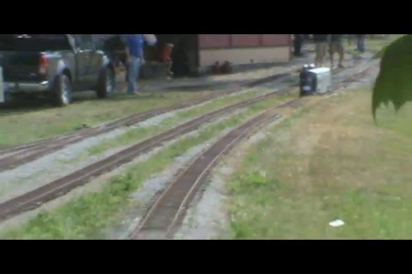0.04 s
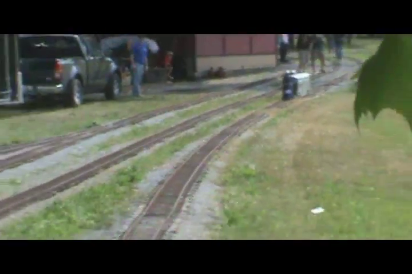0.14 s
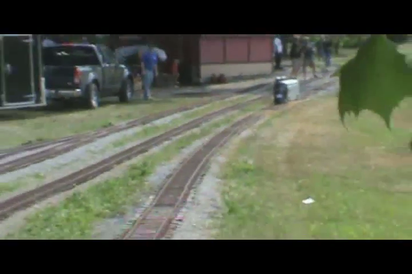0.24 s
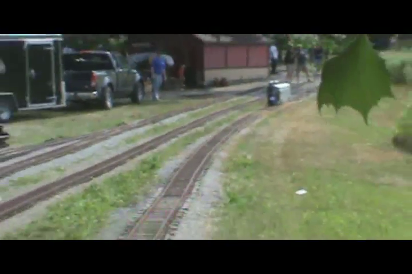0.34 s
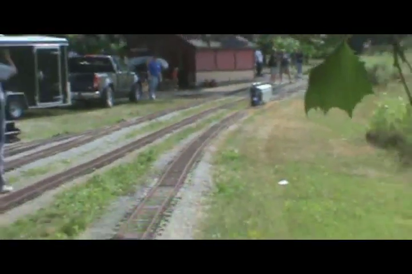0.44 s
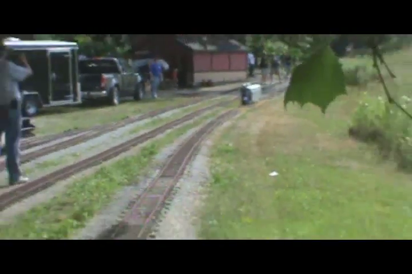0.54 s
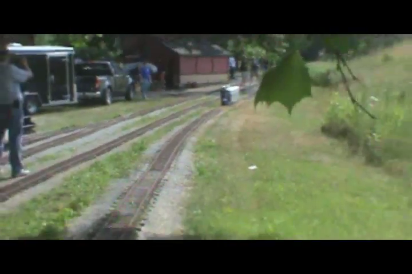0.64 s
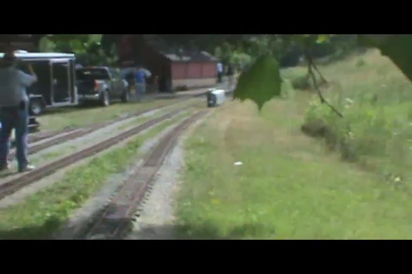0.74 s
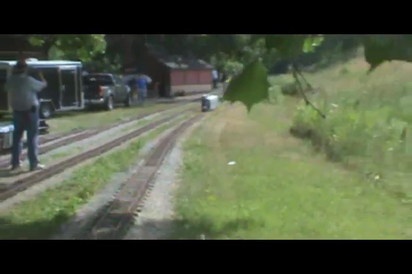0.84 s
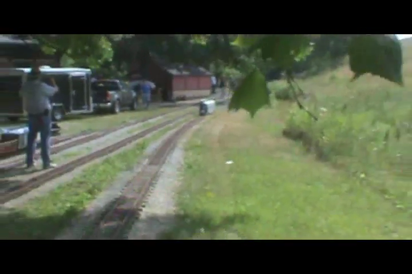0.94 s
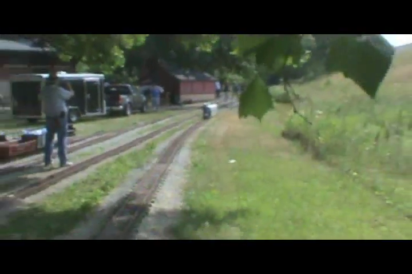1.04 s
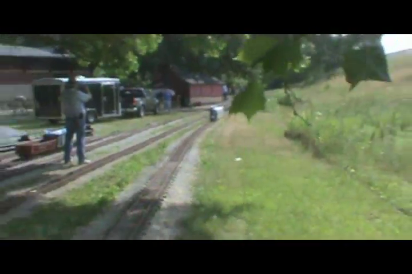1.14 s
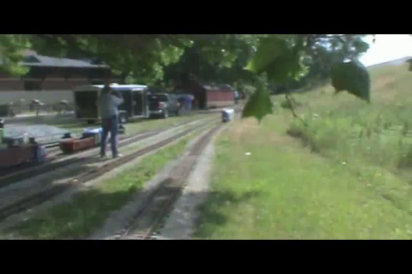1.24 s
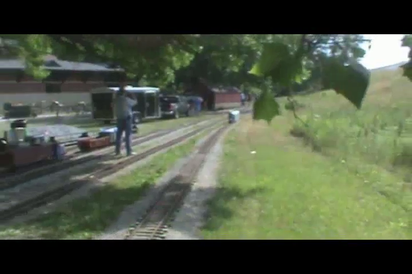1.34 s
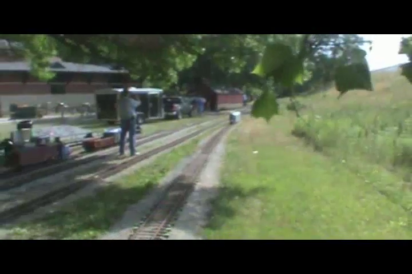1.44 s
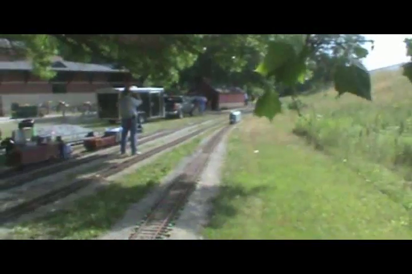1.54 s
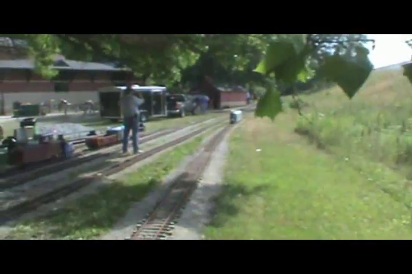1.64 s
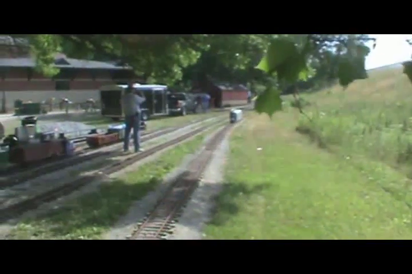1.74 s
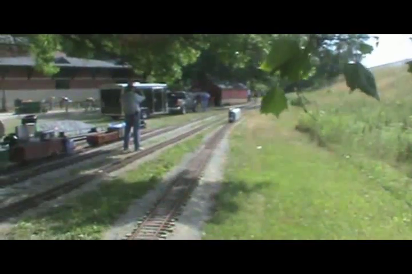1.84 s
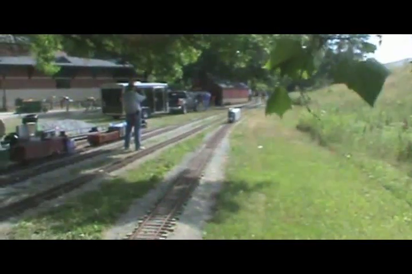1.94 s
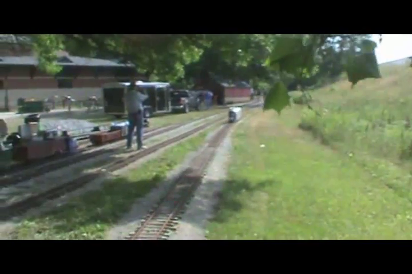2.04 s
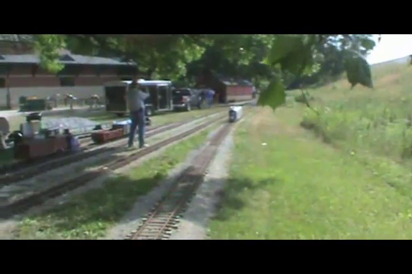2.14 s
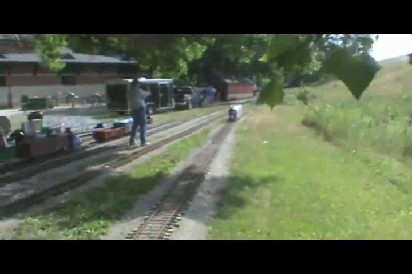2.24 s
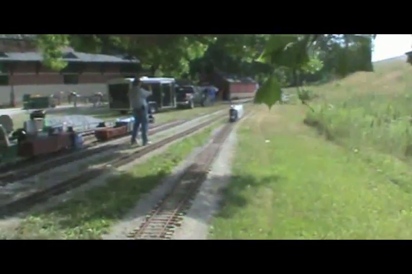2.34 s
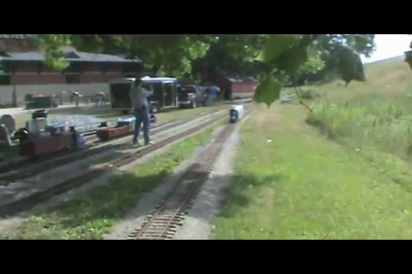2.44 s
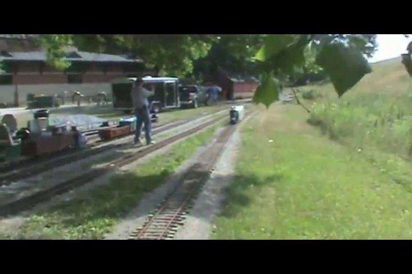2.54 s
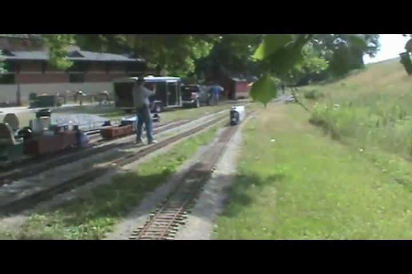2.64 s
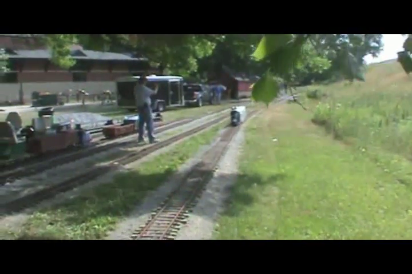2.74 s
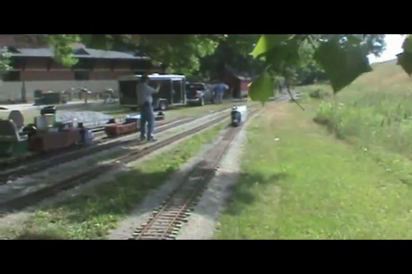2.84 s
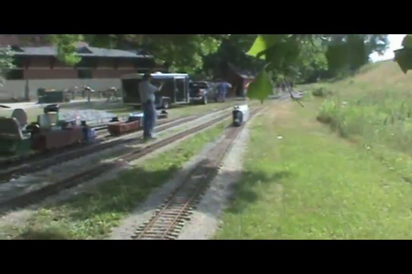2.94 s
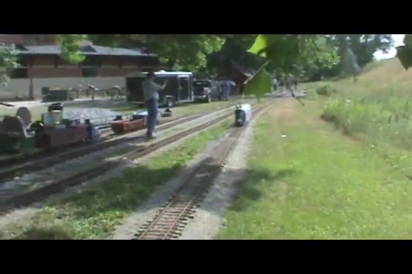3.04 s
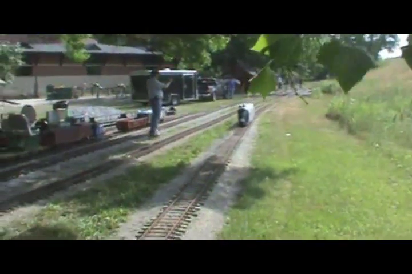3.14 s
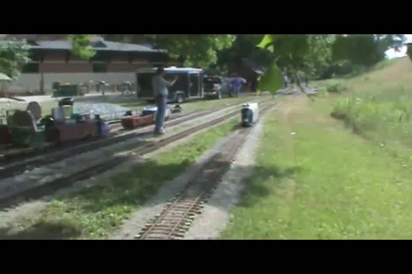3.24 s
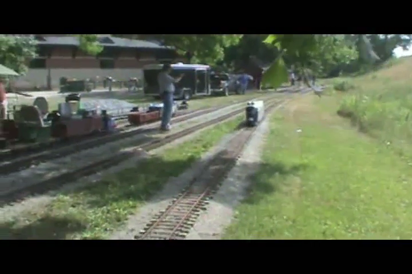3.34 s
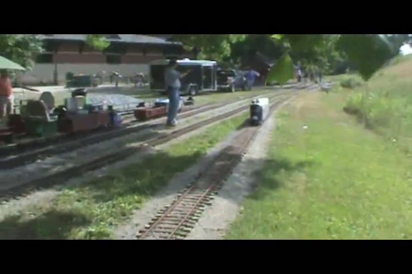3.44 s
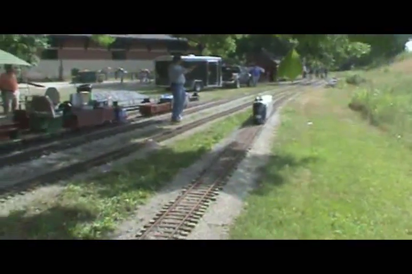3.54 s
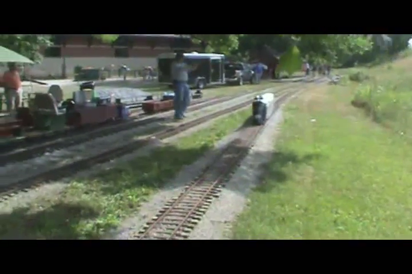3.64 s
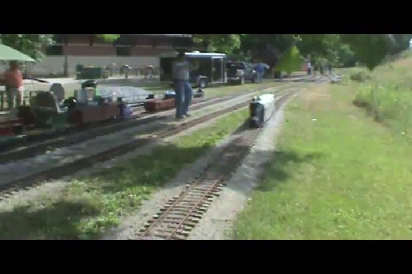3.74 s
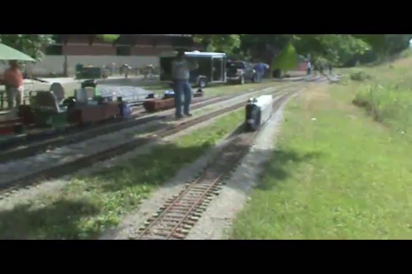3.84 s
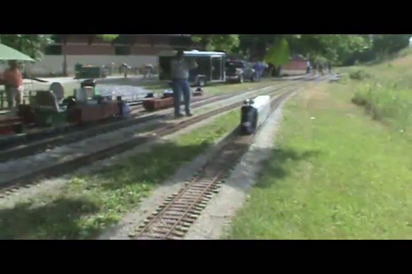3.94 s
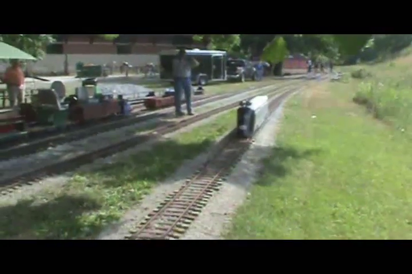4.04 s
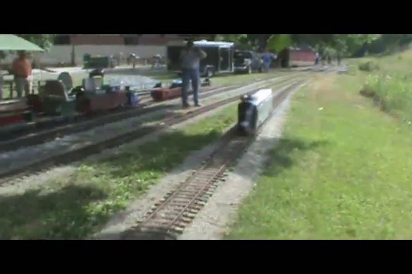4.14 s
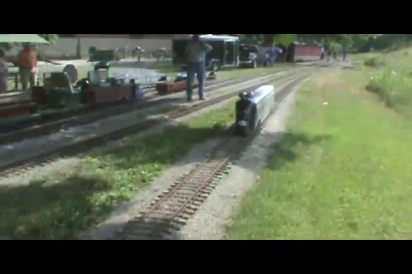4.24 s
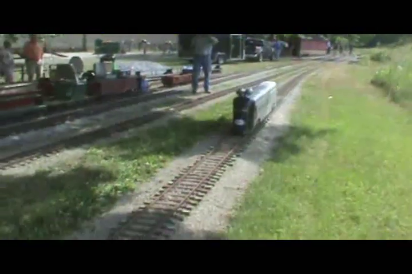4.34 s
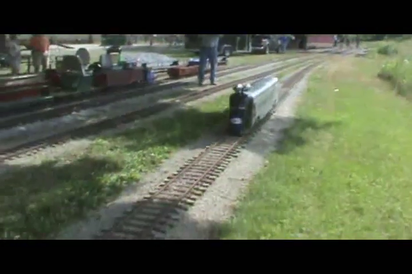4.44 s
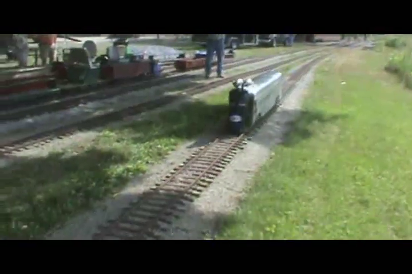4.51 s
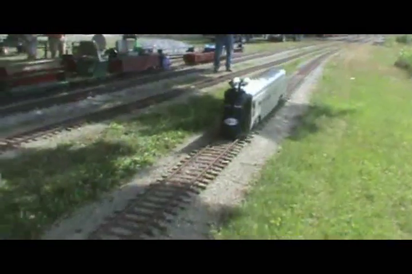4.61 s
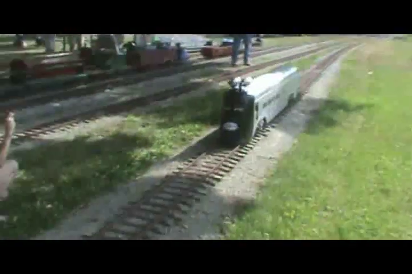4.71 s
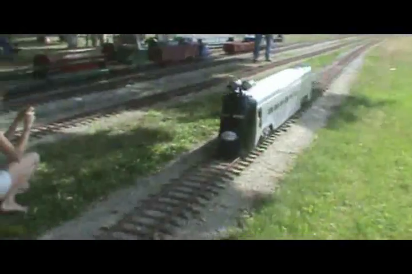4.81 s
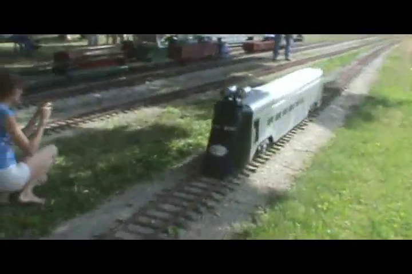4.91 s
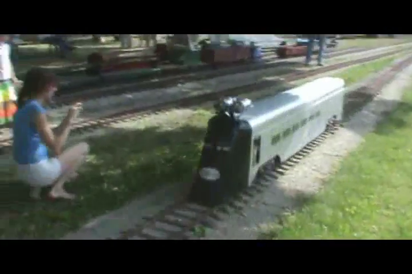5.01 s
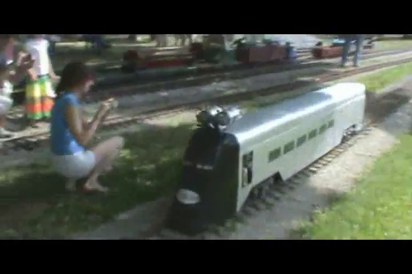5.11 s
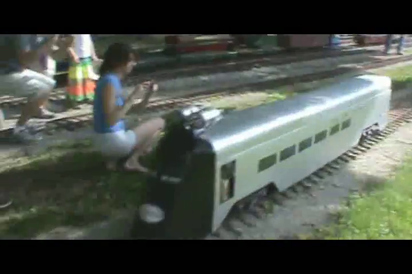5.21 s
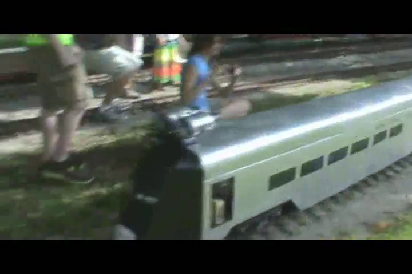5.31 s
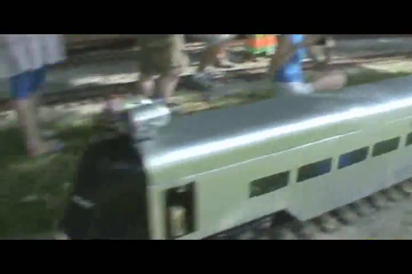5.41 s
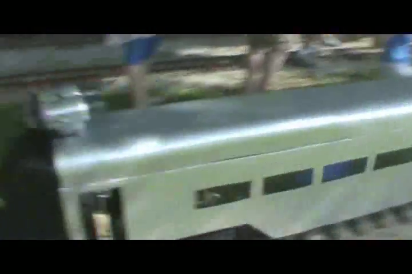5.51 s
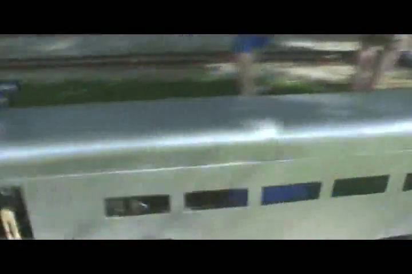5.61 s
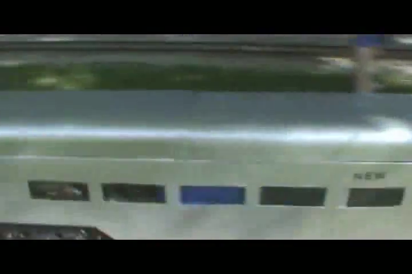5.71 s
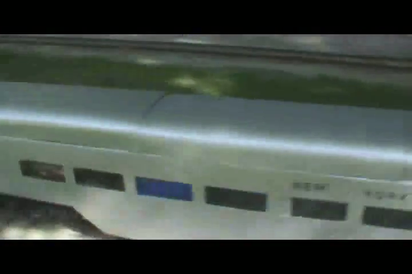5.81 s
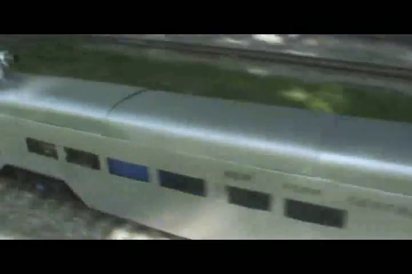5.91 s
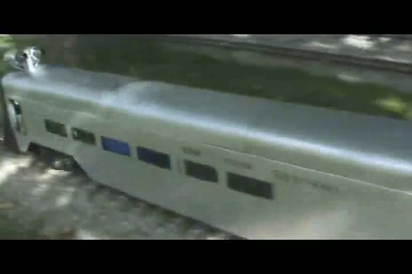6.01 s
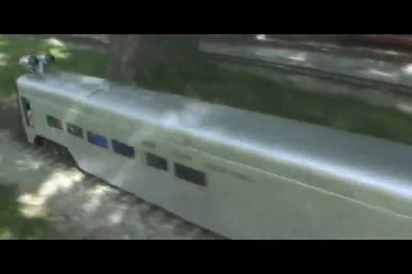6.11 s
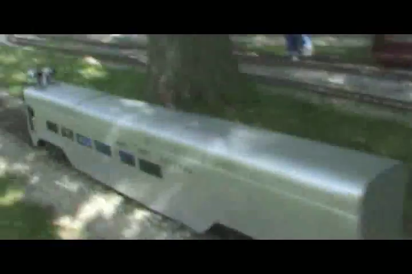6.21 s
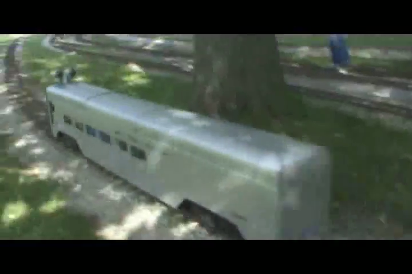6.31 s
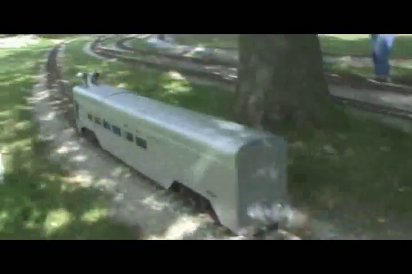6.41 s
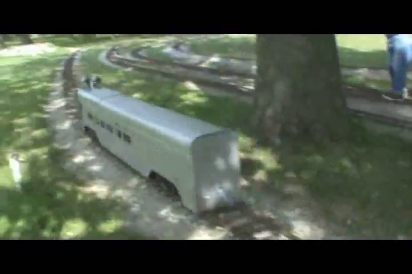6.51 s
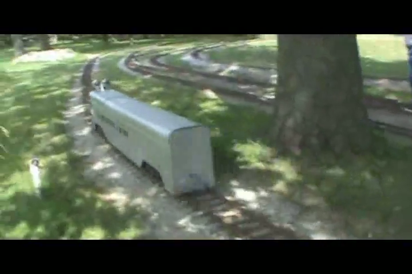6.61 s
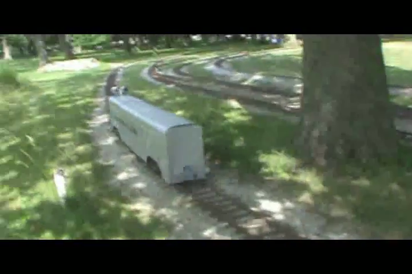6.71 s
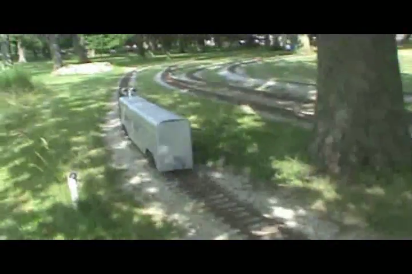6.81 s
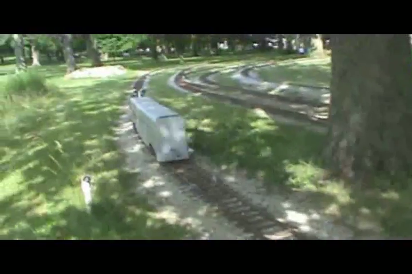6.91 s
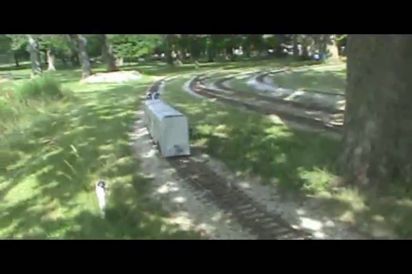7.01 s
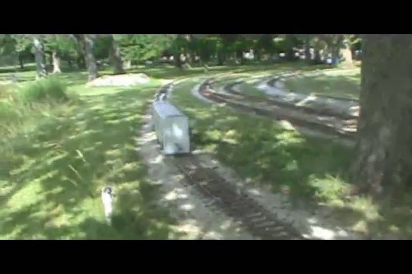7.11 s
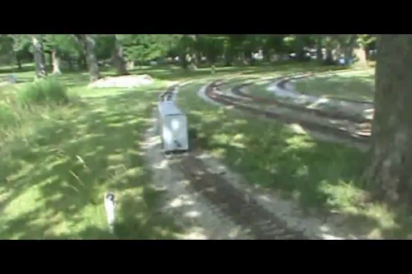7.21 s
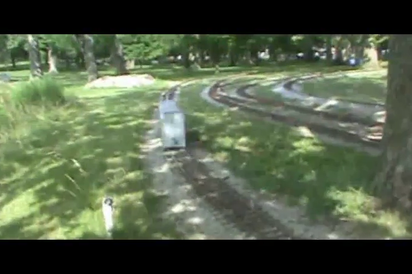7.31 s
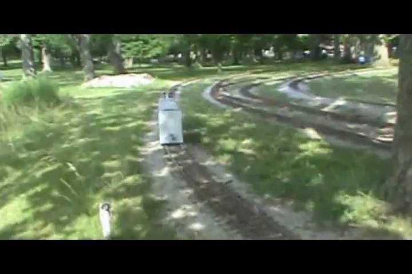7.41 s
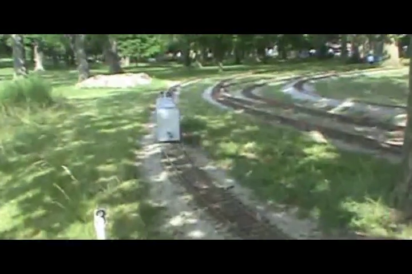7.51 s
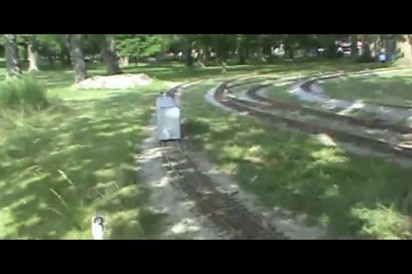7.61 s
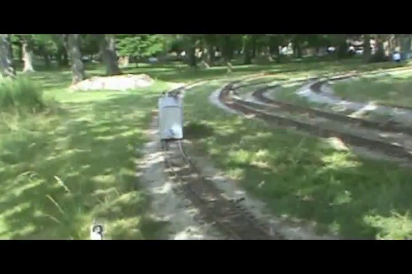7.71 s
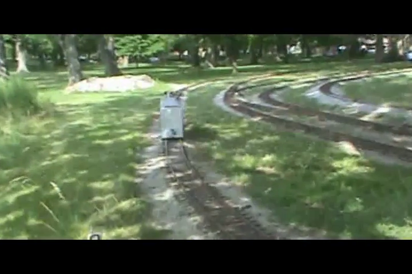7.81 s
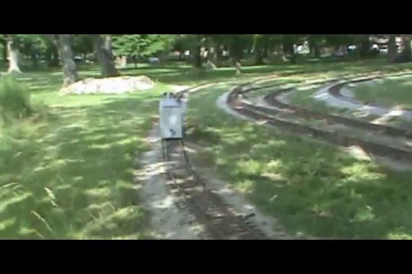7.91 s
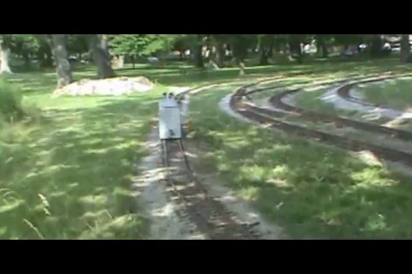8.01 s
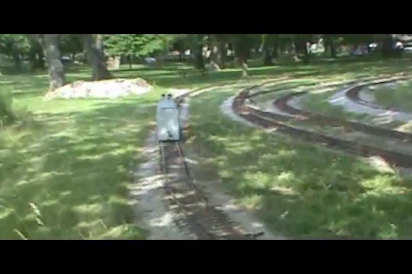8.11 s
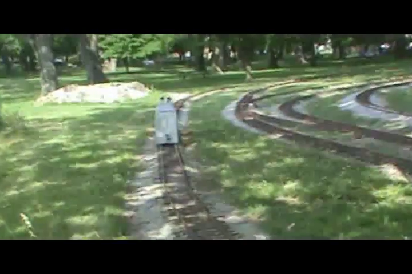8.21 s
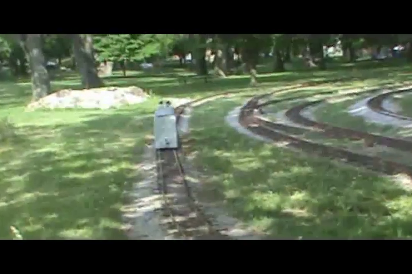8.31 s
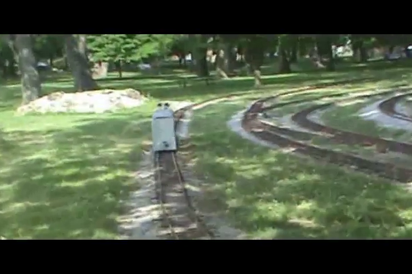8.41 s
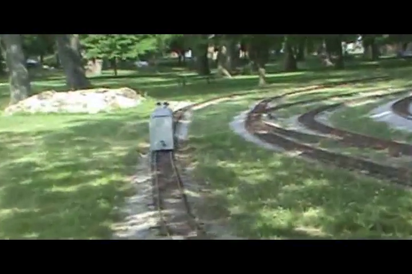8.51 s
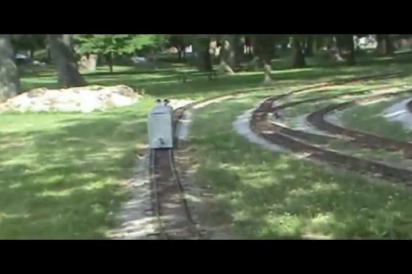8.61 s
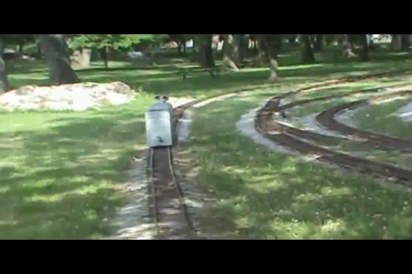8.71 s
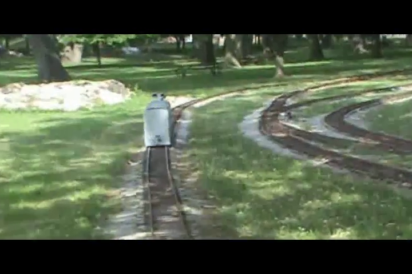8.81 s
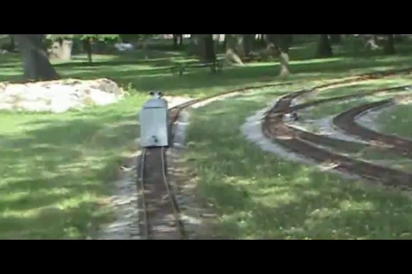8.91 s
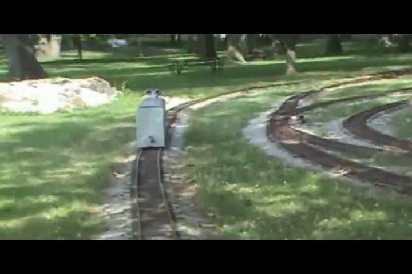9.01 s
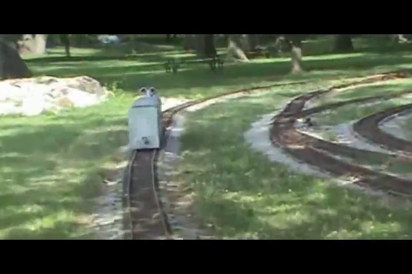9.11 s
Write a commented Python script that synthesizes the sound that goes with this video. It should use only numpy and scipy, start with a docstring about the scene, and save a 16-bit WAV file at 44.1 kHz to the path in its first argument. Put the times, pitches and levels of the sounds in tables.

```python
"""Two turbine whines, hunting and beating, come up a curved park track on a model train that passes close and leaves.
Each whine is a jittered sine; trees and sheds return copies at other Doppler shifts.
Filtered noise makes the jet: intake rush and howl in front, exhaust roar from the side and behind.
Gusts buffet the two microphone ports over a far low rumble; narrow noise bands come and go around the pass.
Wheels knock on rail joints as the train draws away, and a faint short tone peeps near the end."""
import sys
import numpy as np
from scipy import signal
from scipy.fft import rfft, irfft, next_fast_len
from scipy.io import wavfile
from scipy.ndimage import uniform_filter1d, map_coordinates

SR = 44100
rng = np.random.default_rng(int(sys.argv[2]) if len(sys.argv) > 2 else 0)


def to_wav(s):
    """Save 16-bit WAV."""
    ch = np.atleast_2d(s).T  # columns
    pcm = np.round(np.clip(ch, -1, 1) * 32767)  # PCM
    wavfile.write(sys.argv[1], SR, pcm.astype(np.int16))


N = 403515


def amp(db):
    """Gain of a level in dB."""
    return 10 ** (np.asarray(db) / 20)


def unit(x):
    """x scaled to rms 1."""
    return x / np.sqrt(np.mean(np.abs(x) ** 2) + 1e-20)


def along(points, hz):
    """(hz, value) points interpolated on a log frequency axis."""
    f, v = np.transpose(points)
    return np.interp(np.log(hz + 1), np.log(f + 1), v)


def curves(rows):
    """Each column after start_s, linearly interpolated to one value per sample."""
    s, *cols = np.transpose(rows)
    return [np.interp(np.arange(N) / SR, s, c) for c in cols]


def bends(rows):
    """Like curves, but cubic: the slope runs on smoothly through each point."""
    s, *cols = np.transpose(rows)
    t = np.arange(N) / SR
    k = np.clip(np.searchsorted(s, t, "right") - 1, 0, len(s) - 2)
    span_s = np.diff(s)[k]
    u = (t - s[k]) / span_s
    out = []
    for c in cols:
        slope = np.gradient(c, s)
        step = (c[k + 1] - c[k]) * u * u * (3 - 2 * u)
        lean = span_s * u * (1 - u) * (slope[k] * (1 - u) - slope[k + 1] * u)
        out.append(c[k] + step + lean)
    return out


def wobble(rate_hz):
    """Smooth random curve, rate_hz knots per second (48 at most)."""
    knots = rng.standard_normal(50 * N // SR)
    coarse = np.arange(0, N + 64, 64)
    values = map_coordinates(knots, [coarse * min(rate_hz, 48) / SR])
    return np.interp(np.arange(N), coarse, values)


def filtered(x, response):
    """x through a complex response of frequency."""
    m = next_fast_len(N + SR // 2)
    return irfft(rfft(x, m) * response(np.fft.rfftfreq(m, 1 / SR)), m)[..., :N]


def band(lo_hz, hi_hz):
    """Band-pass response with steep slopes."""
    return lambda f: 1 / np.sqrt((1 + (lo_hz / (f + 1)) ** 12) * (1 + (f / hi_hz) ** 12))


def resonance(centre_hz, width_hz):
    """Response of a damped second-order resonator, 1 at its centre."""
    c, w = centre_hz, width_hz
    return lambda f: 1j * f * w / (c * c - f * f + 1j * f * w)


def replayed(pair, speed):
    """Both ports read at a varying speed, which shifts pitch by the same ratio."""
    warp = np.cumsum(speed)
    return np.array([map_coordinates(v, [warp], mode="mirror") for v in pair])


# likeness of the two ports: hz, likeness_0_to_1
PORT_LIKENESS = [(60, 0.8), (300, 1), (700, 0.89), (1500, 0.71), (3000, 0.74), (6800, 0.58), (13000, 0.99)]


def air(patchy_db):
    """Turbulence: two-port noise, partly alike, with time-frequency patches of random gain."""
    z = signal.stft(rng.standard_normal((2, N)), nperseg=512)[2]
    field = uniform_filter1d(rng.standard_normal(z.shape[1:]), size=8, axis=0)
    field = uniform_filter1d(field, size=12, axis=1)
    pair = signal.istft(z * amp(patchy_db * unit(field)), nperseg=512)[1][:, :N]

    def mid_side_gains(hz):
        angle = np.arccos(np.clip(along(PORT_LIKENESS, hz), -1, 1)) / 2
        return np.array([np.cos(angle), np.sin(angle)])

    mid, side = filtered(pair, mid_side_gains)
    return np.array([mid + side, mid - side])


PASS_S, SPEED_M_PER_S, NEAREST_M = 5.75, 6.2, 1.3


def approach():
    """Cosine between heading and listener on a straight pass: 1 coming, -1 going."""
    ahead_m = SPEED_M_PER_S * (PASS_S - np.arange(N) / SR)
    return ahead_m / np.hypot(ahead_m, NEAREST_M)


# hunting rotors as heard: start_s, whine_a_hz, whine_b_hz
ROTOR_PITCH = [(0.0, 8536, 8407), (0.38, 8562, 8468), (0.76, 8494, 8400), (1.14, 8412, 8373),
               (1.52, 8364, 8422), (1.9, 8422, 8477), (2.28, 8503, 8535), (2.7, 8550, 8615),
               (3.04, 8480, 8541), (3.36, 8410, 8415), (3.8, 8347, 8425), (4.18, 8423, 8513),
               (4.56, 8487, 8554), (4.94, 8437, 8490), (5.32, 8353, 8353), (5.6, 8325, 8260),
               (5.89, 8259, 8221), (6.35, 8308, 8296), (6.9, 8236, 8202), (7.54, 8125, 8093),
               (7.86, 8138, 8078), (8.5, 8292, 8255), (9.15, 8216, 8191)]


def rotor_pitches():
    """Heard pitch of both whines, hunting through smooth bends."""
    return bends(ROTOR_PITCH)


def tone(hz, fading_db, jitter_hz):
    """Jittered rotor sine, about rms 1, twinkling a little differently at each port."""
    phase = 2 * np.pi * np.cumsum(hz + jitter_hz * wobble(40)) / SR
    shared_db = fading_db * wobble(22)
    own = np.array([wobble(14), wobble(9.2)])
    return np.sqrt(2) * amp(shared_db + 0.47 * own) * np.sin(phase + 0.47 * own[::-1])


# whine levels: start_s, whine_a_db, whine_b_db
WHINE_LEVELS = [(0, -38, -22.5), (.22, -45, -38), (.5, -28.5, -20.5), (.95, -26, -34), (1.32, -19.5, -29.5),
                (1.9, -25, -29), (2.2, -31.5, -19), (2.45, -26, -25), (2.9, -26, -21), (3.3, -27, -27),
                (3.8, -20, -34), (4.18, -24, -25), (4.5, -16.5, -25.5), (5.06, -22, -17), (5.28, -14, -27),
                (5.5, -24, -15), (5.94, -31.5, -29.5), (6.14, -24.5, -28), (6.45, -49, -30),
                (7.0, -48, -37.5), (8.3, -42, -48), (9.15, -46, -45)]
# weaker rotor tones, as multiples of each whine
ORDER_MULTIPLES = (.5, 1.5)
# mean levels of those tones: start_s, lower_order_db, upper_order_db
ORDER_LEVELS = [(0, -56, -53), (1, -44, -52), (2.4, -43, -49), (3.1, -43, -58), (3.9, -46, -58),
                (4.4, -58, -46), (5.7, -62, -45), (6.4, -66, -64), (6.8, -68, -74), (9.15, -72, -80)]


def rotors(a_hz, b_hz):
    """Two blade-passing whines that beat, each with weaker orders."""
    a_db, b_db = curves(WHINE_LEVELS)
    out = amp(a_db) * tone(a_hz, 0.75, 3.1) + amp(b_db) * tone(b_hz, 2.35, 2.52)
    for multiple, db in zip(ORDER_MULTIPLES, curves(ORDER_LEVELS)):
        for hz in (a_hz, b_hz):
            out += amp(db + 2.5 * wobble(2.5)) * tone(multiple * hz, 3., 8.)
    return out


# whine thrown back by trees and sheds: start_s, level_db
SCATTER_LEVEL = [(0, -29), (.25, -25), (.5, -32), (1, -25), (1.6, -32), (2.4, -26.5), (3.3, -22),
                 (4.2, -24.5), (4.75, -31), (5.2, -22), (5.6, -28), (6.4, -26.5), (7.2, -31), (9.15, -40)]
SOUND_M_PER_S = 343


def scattered(a_hz, b_hz):
    """Copies of the mean whine, each Doppler-shifted by its scatterer's bearing."""
    t, facing = np.arange(N) / SR, approach()
    mach = SPEED_M_PER_S / SOUND_M_PER_S
    emitted_hz = (a_hz + b_hz) / 2 * (1 - facing * SPEED_M_PER_S / SOUND_M_PER_S)
    out = np.zeros((2, N))
    for cosine in np.linspace(-1, 1, num=22):
        detour_s = .05 * (1 - cosine * facing)  # a longer path plays an older pitch
        older_hz = np.interp(t - detour_s, t, emitted_hz)
        phase = 2 * np.pi * np.cumsum(older_hz) / SR * (1 + cosine * mach)
        common = wobble(24.) + 1j * wobble(24.)
        apart = np.array([wobble(22.0) + 1j * wobble(24.)]) * [[.7], [-.7]]
        strength_db = 8.5 * cosine * np.clip(facing, 0, 1) - 5 * cosine ** 8
        out += amp(strength_db) * ((common + apart) * np.exp(1j * phase)).real
    scatter_db, = curves(SCATTER_LEVEL)
    return amp(scatter_db) * unit(out)


FALL_START_S, FALL_LASTS_S = .65, .47
FALL_FROM_HZ, FALL_BY_HZ, FALL_DB = 8400, 150, -28.5


def falling_whine():
    """Whine B's downward slide: a tone falling along a quarter sine."""
    past = (np.arange(N) / SR - FALL_START_S) / FALL_LASTS_S
    gate = np.clip(np.minimum(past, 1 - past) / 0.12 + 1, 0, 1)  # fades lie outside the span
    fall = np.sin(np.pi / 2 * np.clip(past, -1, 1))
    return gate * amp(FALL_DB) * tone(FALL_FROM_HZ - FALL_BY_HZ * fall, 1.2, 4.9)


def whines():
    """Direct rotor tones, whine B's downward slide and the scatter."""
    a_hz, b_hz = rotor_pitches()
    return rotors(a_hz, b_hz) + falling_whine() + scattered(a_hz, b_hz)


# low roar: start_s, level_db
ROAR_LEVEL = [(0, -41.5), (.8, -38), (1.4, -42), (2.2, -39), (2.9, -40.5), (4.2, -37.5), (4.6, -41),
              (5.3, -39.5), (5.58, -36), (5.72, -30), (5.93, -28), (6.35, -35.5), (7.2, -46), (9.15, -51)]
# spectra by side heard: hz, density_db_per_hz
FRONT_SPECTRUM = [(150, -29.5), (400, -21), (625, -12), (1300, -19.5), (1650, -18), (1900, -10.5),
                  (2150, -12), (2460, -8), (2800, -12.5), (3060, -9), (3520, -17), (3940, -12), (5200, -12),
                  (5700, -10), (6200, -15), (6950, -19), (7400, -15), (9100, -14.5), (10000, -18.5),
                  (10700, -15.5), (13100, -19.5), (14200, -23), (15600, -60)]
SIDE_SPECTRUM = [(50, -16), (105, -8), (180, -9), (328, 4), (430, 3), (498, -1), (559, 3), (811, -0.5),
                 (1380, -11.5), (1750, -11), (2590, -12.5), (3900, -17.5), (5000, -24), (6890, -36),
                 (8890, -22), (12300, -15), (15600, -21)]
REAR_SPECTRUM = [(50, -32), (231, -14), (360, -26), (643, -8), (933, -15), (1500, -16), (1800, -10.5),
                 (2300, -8.5), (2650, -6), (2980, -5.5), (3250, -15.5), (4530, -14.5), (5600, -22),
                 (6200, -23.5), (6500, -28), (7050, -31), (7400, -27), (12600, -32), (15600, -59)]
# inlet resonances heard from the front: centre_hz, width_hz
INLET_RINGS = [(9300, 400), (10800, 700)]
INLET_VS_HISS_DB = -10.5


def rush(rush_db, sizzle_db, hiss_db, flutter_db, shares):
    """Turbulent noise in four bands, coloured by the side facing the listener, plus inlet ringing."""
    roar_db, = curves(ROAR_LEVEL)
    flow, out = air(patchy_db=1.0), 0
    # level_db, filter span_hz, core_hz over which the level is set
    layers = [(roar_db, (30, 1300), (350, 1300)), (rush_db, (1300, 4500), (1300, 4100)),
              (sizzle_db, (4500, 8300), (4900, 6400)), (hiss_db, (8300, 17000), (9000, 15000))]
    for level_db, span, core in layers:
        for share, spectrum in zip(shares, (FRONT_SPECTRUM, SIDE_SPECTRUM, REAR_SPECTRUM)):
            f = np.linspace(*core, num=400)
            power = np.mean(amp(2 * along(spectrum, f))) * (core[1] - core[0]) * 2 / SR
            coloured = filtered(flow, lambda hz: amp(along(spectrum, hz)) * band(*span)(hz))
            out = out + share * amp(level_db + flutter_db) / np.sqrt(power) * coloured
    ring = lambda f: sum(1 / np.sqrt(w) * resonance(c, w)(f) ** 2 for c, w in INLET_RINGS)
    inlet_gain = shares[0] * amp(hiss_db + INLET_VS_HISS_DB + flutter_db)
    return out + inlet_gain * unit(filtered(flow, ring))


# base level of the intake howl: start_s, level_db
HOWL_LEVEL = [(0, -29.5), (.2, -27.5), (.55, -31.5), (.74, -26.5), (1.3, -25), (1.9, -21), (2.45, -34),
              (2.9, -32), (3.35, -27.5), (3.7, -31), (4.3, -27.5), (4.6, -31.5), (5.6, -34.5), (5.9, -28),
              (6.3, -42), (7.0, -46), (7.6, -46), (9.15, -52)]
# howl at the reference whine pitch: centre_hz, width_hz, skirt_width_hz, skirt_share_0_to_1
HOWL_SHAPE = (4560, 150, 560, .33)
HOWL_REFERENCE_WHINE_HZ = 8455
RIDING_VS_HISS_DB = -9


def intake_howl(hiss_db, flutter_db, front_share):
    """Duct-resonant noise hunting with the rotors; its product with the whine adds a sum-pitch band."""
    howl_db, = curves(HOWL_LEVEL)
    c, narrow, wide, skirt = HOWL_SHAPE
    duct = lambda f: resonance(c, narrow)(f) ** 2 + skirt * resonance(c, wide)(f) ** 2
    noise = filtered(air(patchy_db=1.3), duct)
    whine_hz = np.mean(rotor_pitches(), axis=0)
    howl = unit(replayed(noise, (whine_hz / HOWL_REFERENCE_WHINE_HZ) ** .8 + .003 * wobble(5.)))
    whine = np.sin(2 * np.pi * np.cumsum(whine_hz) / SR)
    riding = unit(filtered(howl * whine, band(10000, 20000)))
    breaks_db = .8 * wobble(11.) + .6 * flutter_db
    direct = amp(howl_db - 4.2 * (1 - approach()) + 1 + breaks_db) * howl
    return direct + front_share * amp(hiss_db + RIDING_VS_HISS_DB + breaks_db) * riding


# jet noise levels: start_s, rush_db, sizzle_db
JET_LEVELS = [(0, -37, -34), (.25, -35, -34.5), (.55, -37, -33), (.8, -33.5, -33), (1.25, -32, -28),
              (1.42, -34, -30), (1.72, -28.5, -28), (2, -29, -34.5), (2.55, -28, -31), (2.95, -32.5, -31.5),
              (4.05, -32, -31), (4.3, -30, -30), (4.55, -34.5, -33), (5.05, -35.5, -36.5),
              (5.64, -38.5, -41), (5.76, -30.5, -32), (5.92, -30.5, -31.5), (6.15, -29, -39),
              (6.6, -36.5, -46), (7.4, -42.5, -51), (9.15, -45, -57)]
HISS_VS_SIZZLE_DB, HISS_BEHIND_DB = -3.5, -6  # second: further change with the train gone by
# brief ducks and flares of the top hiss: centre_s, half_width_s, change_db
HISS_FLICKERS = [(.21, .11, -13), (.72, .09, -13), (1.55, .16, -13), (1.98, .17, 7), (2.68, .18, 4.5),
                 (3.75, .15, -3)]
CHOP_CENTRE_S, CHOP_HALF_WIDTH_S, CHOP_DEPTH_DB = 5.15, .3, 2.2


def jet():
    """Rush and howl sharing one flutter, which stutters just before the pass."""
    rush_db, sizzle_db = curves(JET_LEVELS)
    facing, t = approach(), np.arange(N) / SR
    hiss_db = sizzle_db + HISS_VS_SIZZLE_DB + HISS_BEHIND_DB * np.clip(-facing, 0, 1)
    hiss_db += sum(db * np.exp(-((t - s) / half) ** 4) for s, half, db in HISS_FLICKERS)
    ahead, behind = np.clip(facing, 0, 1) ** 4., np.clip(-facing, 0, 1) ** 42.
    shares = np.sqrt([ahead, 1 - ahead - behind, behind])
    chop_db = CHOP_DEPTH_DB * np.exp(-((t - CHOP_CENTRE_S) / CHOP_HALF_WIDTH_S) ** 2)
    flutter_db = .45 * wobble(14.) + 0.8 * wobble(30.) + chop_db * wobble(36.)
    return rush(rush_db, sizzle_db, hiss_db, flutter_db, shares) + intake_howl(hiss_db, flutter_db, shares[0])


# steady buffeting: start_s, level_db
BREEZE_LEVEL = [(0, -35.5), (.9, -34), (1.5, -38.5), (3.2, -39.5), (4.2, -43), (4.7, -50), (5.7, -50),
                (6.6, -58), (9.15, -55)]
# gusts on the ports: peak_s, peak_db, rise_s_per_20_db, dying_s_per_20_db
GUST_EVENTS = [(.5, -36, .4, .1), (.63, -25, .04, .12), (.7, -29, .05, .15), (.83, -21, .03, .06),
               (1.77, -30, .05, 0.1), (2.19, -38, 0.05, .15), (2.378, -22, .02, .04), (2.46, -33, .05, .12),
               (2.96, -35, 0.14, .1), (3.06, -33, .05, .05), (3.39, -35, .08, .06), (3.655, -31, .03, .04),
               (3.85, -37, .05, .08), (3.95, -24, .07, .07), (4.27, -36, .03, .05)]
# wind spectrum: hz, density_db_per_hz
WIND_SPECTRUM = [(15, -36), (25, -6.5), (70, 1), (167, -2.5), (226, -5), (450, -21), (580, -49),
                 (990, -120)]
GUST_LOW_HZ = 70  # gusts carry little below this


def wind():
    """Lumpy buffeting with sudden gusts; the deepest part presses both ports alike, the rest differs."""
    breeze_db, = curves(BREEZE_LEVEL)
    t = np.arange(N) / SR
    gusts = sum(amp(db - 20 * np.maximum((s - t) / rise, (t - s) / dies))
                for s, db, rise, dies in GUST_EVENTS)
    noise = rng.standard_normal((3, N))
    lumps = amp(1.9 * np.array([wobble(15.), wobble(15.)]) + 2.4 * wobble(22.02))
    own = filtered(noise[:2], lambda hz: amp(along(WIND_SPECTRUM, hz)))
    deep_tilt = [(30, 7), (200, -4.5)]  # hz, db
    both = filtered(noise[2], lambda hz: amp(along(WIND_SPECTRUM, hz) + along(deep_tilt, hz)))
    thin = filtered(own + both, lambda hz: hz ** 2 / (hz ** 2 + GUST_LOW_HZ ** 2))
    return amp(breeze_db) * unit(lumps * (own + both)) + gusts * unit(thin)


# far rumble: hz, density_db_per_hz
DISTANT_SPECTRUM = [(40, -14), (170, -0.5), (260, -3), (420, -21.5)]


def park():
    """Far low rumble: band-limited noise with a slightly wavering level."""
    rumble = filtered(air(patchy_db=2.0), lambda hz: amp(along(DISTANT_SPECTRUM, hz)) * band(30, 600)(hz))
    return amp(-49.5 + 0.91 * wobble(4.1)) * unit(rumble)


def hum(shape, db, sag=0, wander=.008, slide_hz=None):
    """Noise through one resonance; its pitch wanders, sags through the pass or follows a curve."""
    centre_hz, width_hz = shape
    rung = filtered(air(patchy_db=1.5), lambda f: resonance(centre_hz, width_hz)(f) ** 2)
    ratio = 1 if slide_hz is None else slide_hz / centre_hz
    return amp(db) * unit(replayed(rung, ratio + sag * approach() + wander * wobble(2.5)))


def sliding(width_hz, rows):
    """A noise band following its level and pitch columns; width_hz holds at the mean pitch."""
    db, hz = curves(rows)
    return hum((hz.mean(), width_hz), db, slide_hz=hz)


# upper intake band: centre_hz, width_hz
UPPER_SHAPE = (5620, 450)
# its level: start_s, level_db
UPPER_LEVEL = [(.7, -48), (1.5, -36), (2.1, -48), (2.7, -36), (3.3, -42), (4.2, -35), (4.5, -40),
               (5.35, -34), (5.65, -52)]


def upper_intake():
    """Upper intake noise band that comes and goes."""
    return hum(UPPER_SHAPE, *curves(UPPER_LEVEL))


# echo off the grass: start_s, delay_ms, strength_0_to_1
GROUND_ECHO = [(5.2, 1.15, .1), (5.6, 1.18, .4), (5.8, 1.05, .55), (6.05, 1.3, .55), (6.22, 1.45, .48),
               (6.55, 1.6, .25), (9.15, 1.1, .2)]


def ground(x):
    """Grass returns the lower part a moment late; the comb slides as the train goes by."""
    late_ms, strength = curves(GROUND_ECHO)
    soft = filtered(x, band(30, 2200))
    older = np.arange(N) - late_ms * SR / 1000
    return x + np.clip(strength, 0, 1) * np.array([map_coordinates(v, [older]) for v in soft])


# low roar band around the pass: start_s, level_db, pitch_hz
PASS_BAND = [(5.2, -60, 840), (5.52, -32, 830), (5.98, -30, 790), (6.3, -37, 740), (6.6, -43, 640),
             (6.86, -44, 740), (7.0, -60, 740)]


def pass_band():
    """Low roar band around the pass, sliding down and back up in pitch."""
    return sliding(250, PASS_BAND)


# bright exhaust band: centre_hz, width_hz
BLAST_SHAPE = (4300, 2200)
# its level: start_s, level_db
BLAST_LEVEL = [(5.64, -52), (5.78, -36), (5.9, -31), (6.02, -36), (6.22, -36), (6.6, -55)]


def exhaust_blast():
    """Bright exhaust band sweeping down through the pass."""
    return hum(BLAST_SHAPE, *curves(BLAST_LEVEL), sag=.3)


# thin howl from behind: centre_hz, width_hz
AFT_HOWL_SHAPE = (4450, 45)
# its level: start_s, level_db
AFT_HOWL_LEVEL = [(6.3, -70), (7.3, -49), (7.95, -49.5), (8.2, -58), (9.15, -57)]


def aft_howl():
    """Narrow, nearly steady resonance heard from behind."""
    return hum(AFT_HOWL_SHAPE, *curves(AFT_HOWL_LEVEL), wander=.003)


# exhaust resonance: start_s, level_db, pitch_hz
TAIL_PIPE_RING = [(6.7, -66, 2880), (6.83, -41, 2880), (7.35, -50, 2990), (8.03, -45.5, 2940),
                  (8.3, -50, 3020), (8.68, -48, 3070), (8.85, -50, 2750), (9.15, -52, 2800)]


def tail_pipe():
    """Exhaust resonance of sliding pitch."""
    return sliding(200, TAIL_PIPE_RING)


# wheels over rail joints: start_s, envelope_peak_db, pitch_hz
JOINT_KNOCKS = [(7.1099, -20, 690), (7.118, -27, 700), (7.386, -31, 218), (7.864, -35, 194),
                (8.8757, -22.5, 570)]
KNOCK_CYCLES = 2.6


def joints():
    """Dull knocks of wheel on rail end: a few sine cycles that swell and die."""
    out = np.zeros(N + SR)
    for s, db, hz in JOINT_KNOCKS:
        cycles = np.arange(0, KNOCK_CYCLES, hz / SR)
        knock = np.hanning(len(cycles)) * np.sin(2 * np.pi * (cycles - KNOCK_CYCLES / 2))
        out[round(s * SR):][:len(cycles)] += amp(db) * knock
    return out[:N]


# faint short tone: centre_s, half_width_s, pitch_hz, peak_db
PEEP_TONE = (8.68, .07, 2130, -52)


def peep():
    """One faint sine of steady pitch that swells and fades."""
    s, half, hz, db = PEEP_TONE
    t = np.arange(N) / SR
    return amp(db) * np.exp(-((t - s) / half) ** 2) * np.sin(2 * np.pi * hz * t)


# level difference, left over right: start_s, whine_db, rush_db
PORT_BALANCE = [(0, 0.5, -1.5), (3.5, 1.5, -2), (4.6, -2.5, -1.5), (5.27, -2, -2), (5.73, 8.5, 0.5),
                (6.17, 10.5, -1), (6.5, 5, -2.5), (7.3, 0, -2.5), (9.15, 0, -3.5)]
# phase lead of the left port: hz, lead_rad
LEFT_LEAD = [(300, -0.76), (1300, -0.086), (1900, -0.8), (4500, 0.2)]
# how much the left port favours each pitch: hz, left_over_right_db
LEFT_TILT = [(300, -0.5), (1300, 1.5), (2200, 0.5), (5000, -1), (11000, 2)]


def scene():
    """The train, placed left or right, plus wind and far rumble."""
    whine_db, rush_db = curves(PORT_BALANCE)
    sides = np.array([[.5], [-.5]])
    bands = upper_intake() + pass_band() + aft_howl() + tail_pipe()
    train = ground(jet() + exhaust_blast()) + bands + joints() + peep()
    placing = lambda hz: np.exp(1j * along(LEFT_LEAD, hz) * sides) * amp(along(LEFT_TILT, hz) * sides)
    noise = filtered(train, placing) * amp(rush_db * sides)
    return noise + whines() * amp(whine_db * sides) + wind() + park()


TOP_HZ = 15700


def record(dry):
    """Sharp band limit: nothing passes at or above TOP_HZ."""
    return filtered(dry, lambda hz: hz < TOP_HZ)


dry = scene()
out = record(dry)
to_wav(out)
```